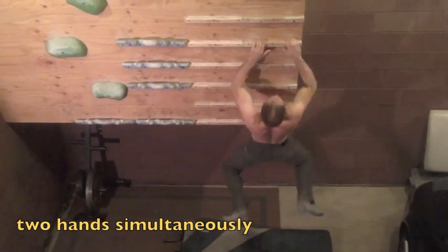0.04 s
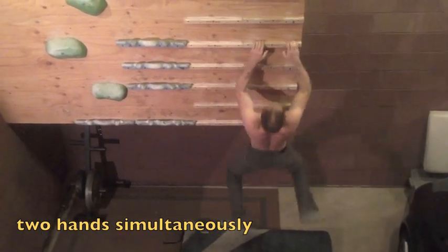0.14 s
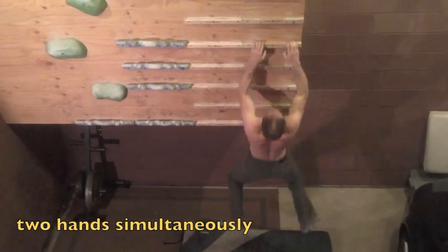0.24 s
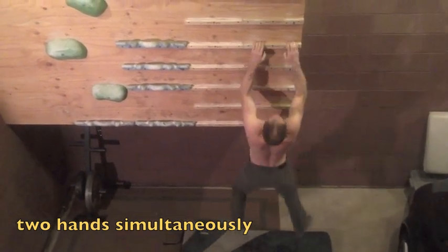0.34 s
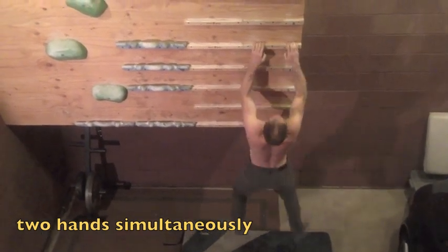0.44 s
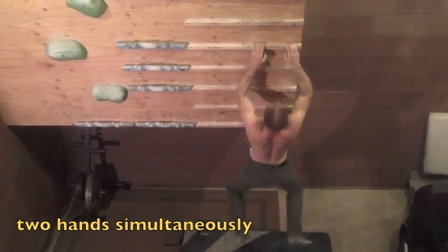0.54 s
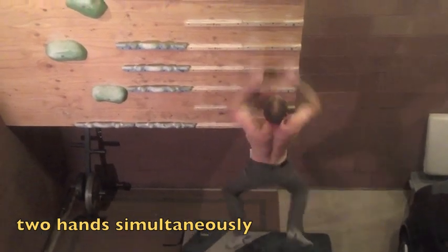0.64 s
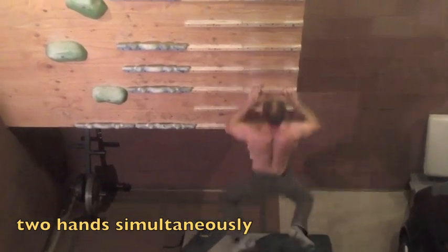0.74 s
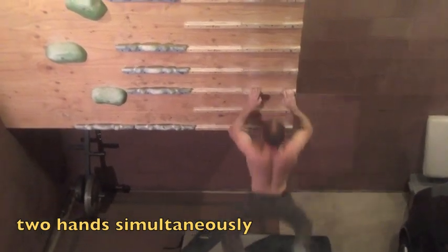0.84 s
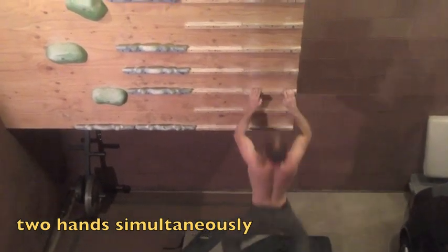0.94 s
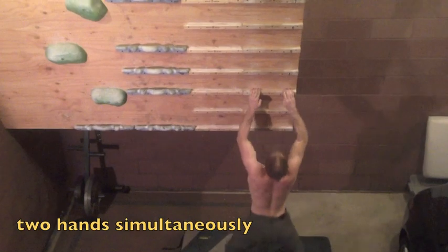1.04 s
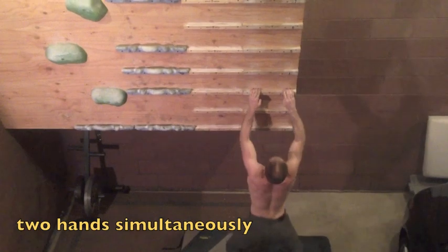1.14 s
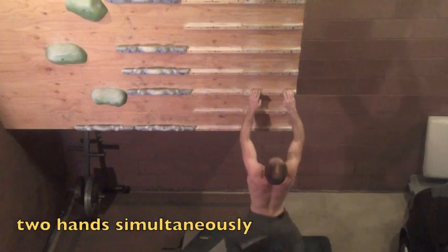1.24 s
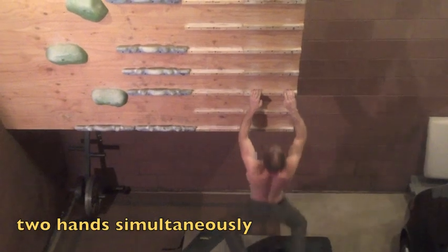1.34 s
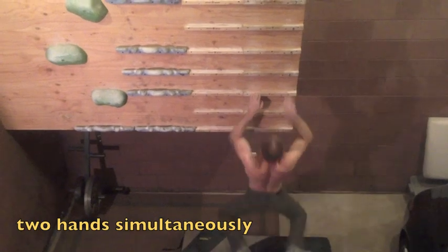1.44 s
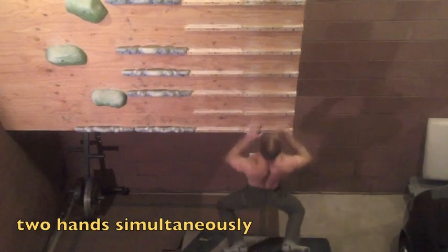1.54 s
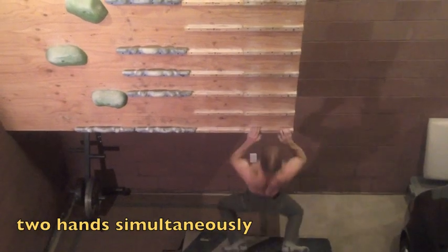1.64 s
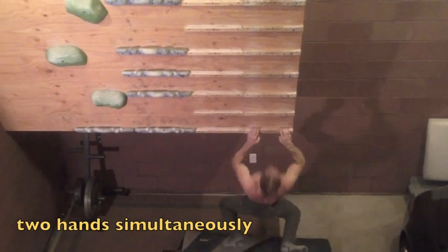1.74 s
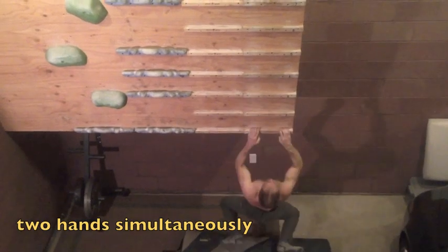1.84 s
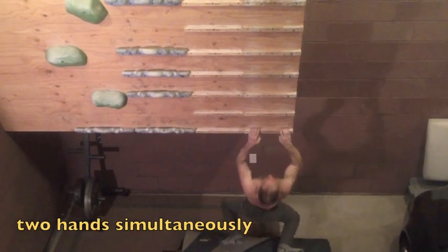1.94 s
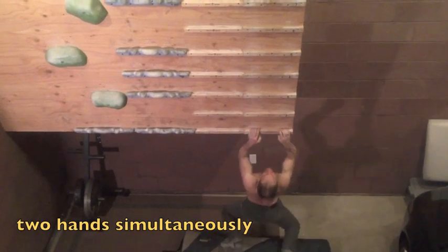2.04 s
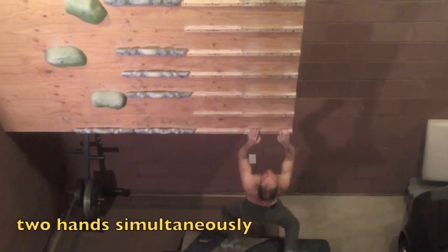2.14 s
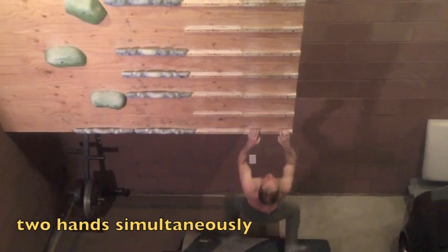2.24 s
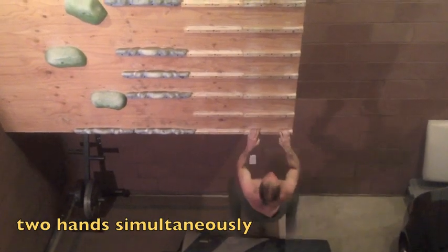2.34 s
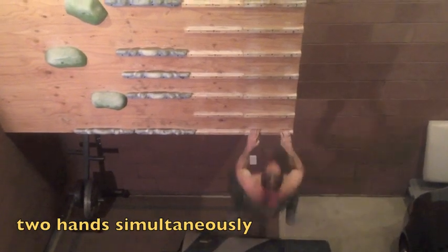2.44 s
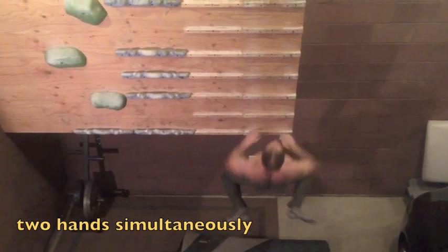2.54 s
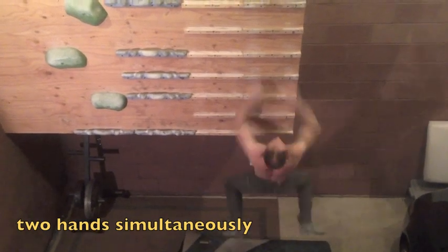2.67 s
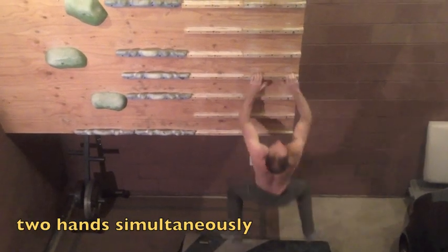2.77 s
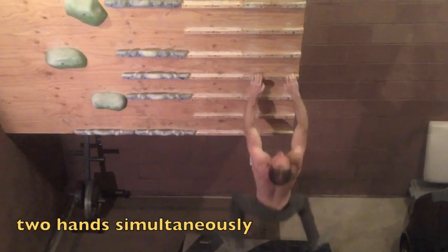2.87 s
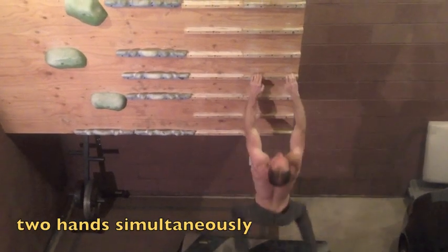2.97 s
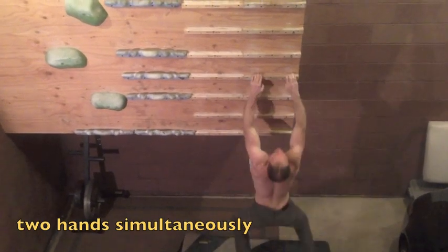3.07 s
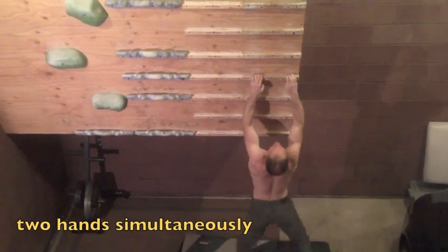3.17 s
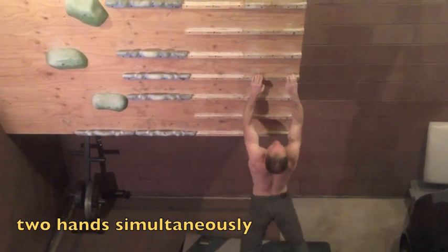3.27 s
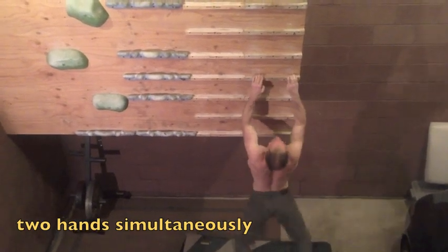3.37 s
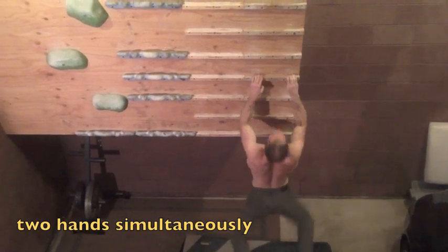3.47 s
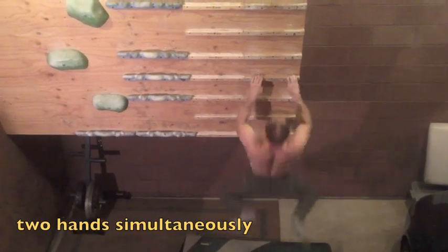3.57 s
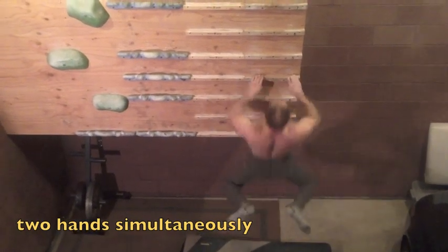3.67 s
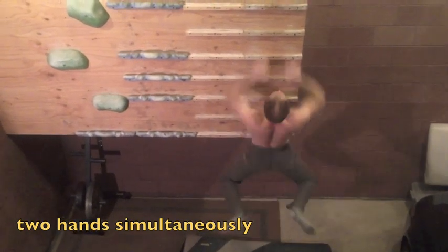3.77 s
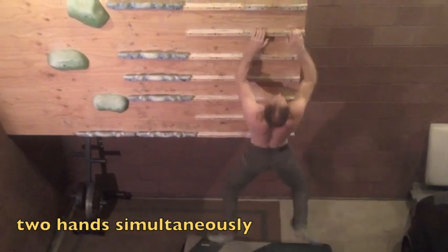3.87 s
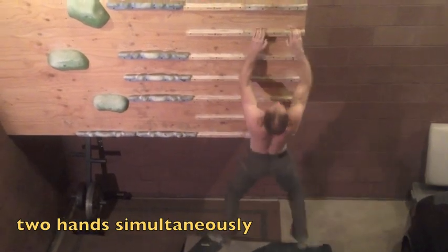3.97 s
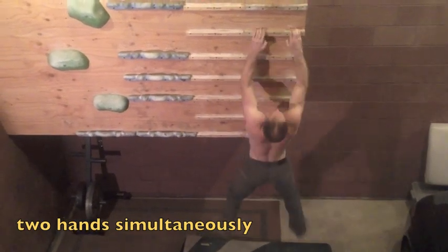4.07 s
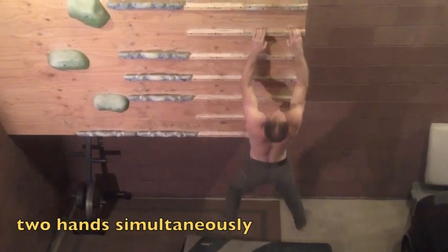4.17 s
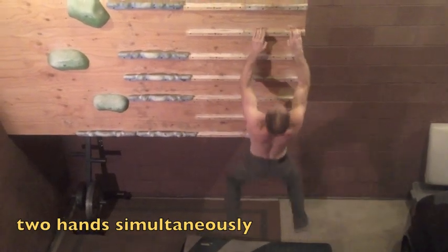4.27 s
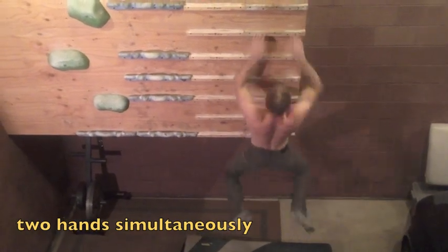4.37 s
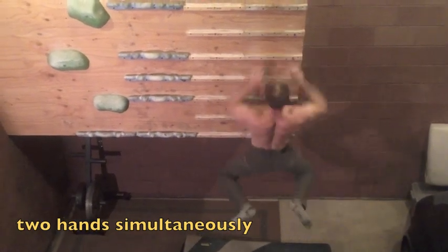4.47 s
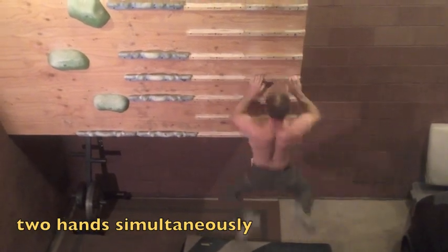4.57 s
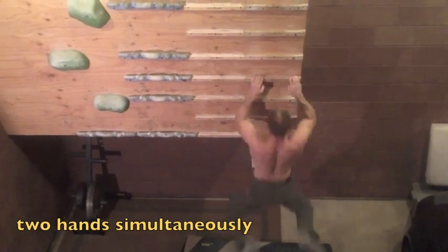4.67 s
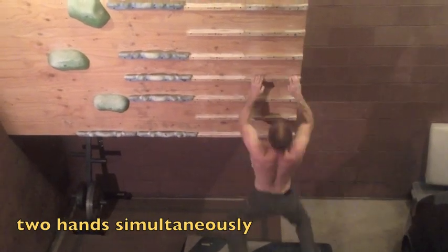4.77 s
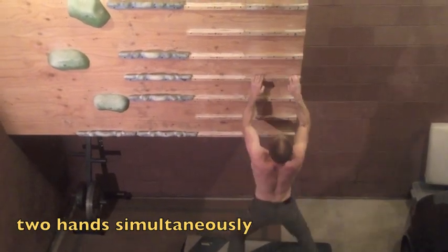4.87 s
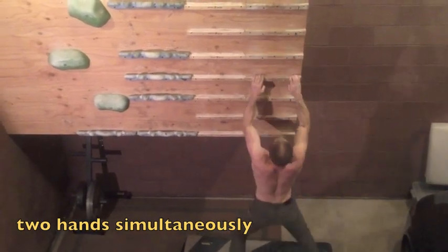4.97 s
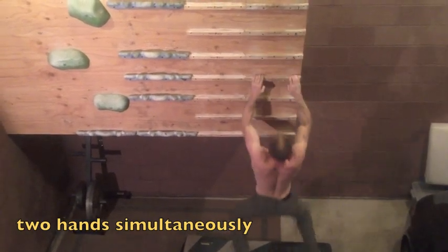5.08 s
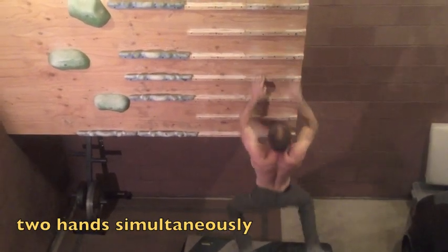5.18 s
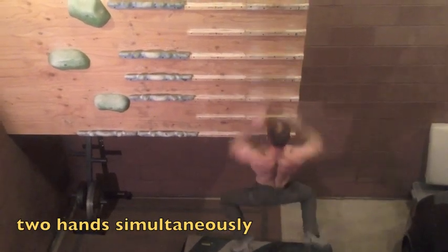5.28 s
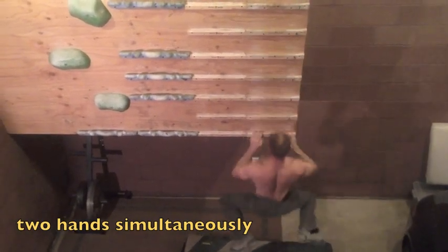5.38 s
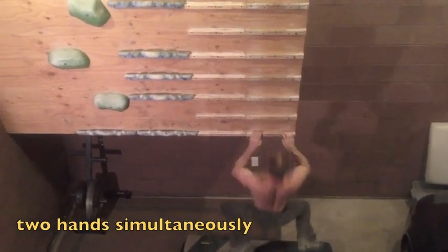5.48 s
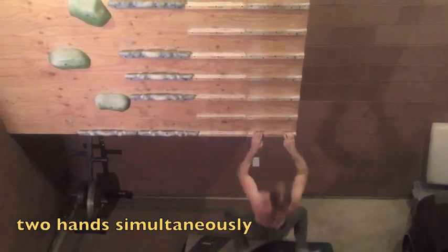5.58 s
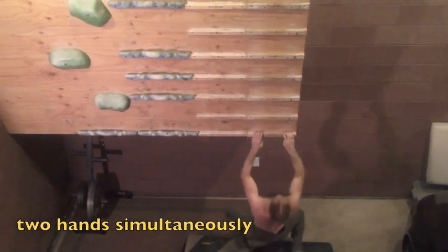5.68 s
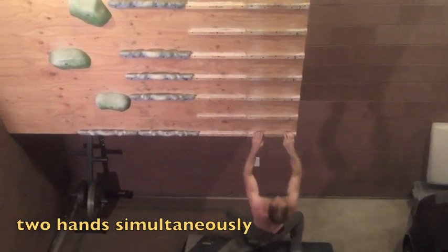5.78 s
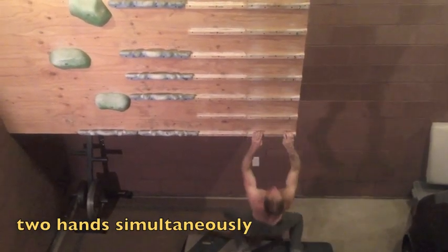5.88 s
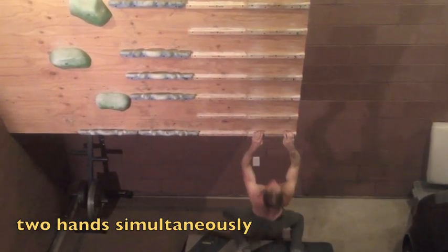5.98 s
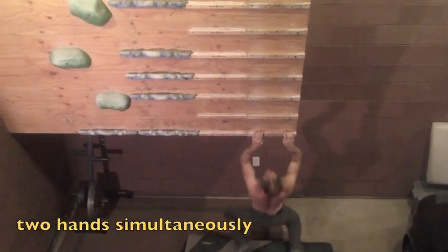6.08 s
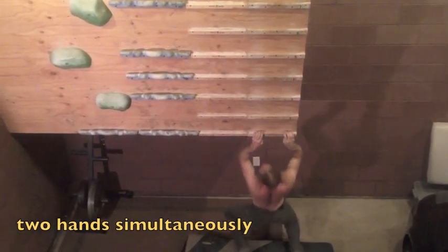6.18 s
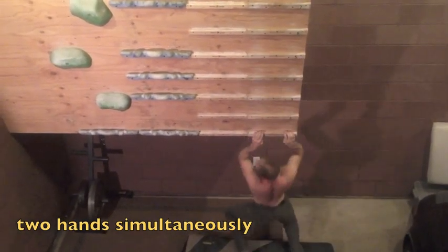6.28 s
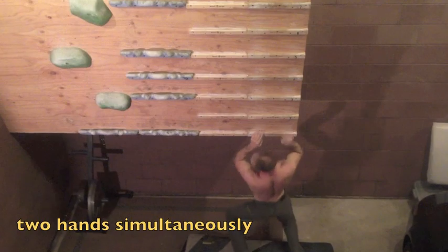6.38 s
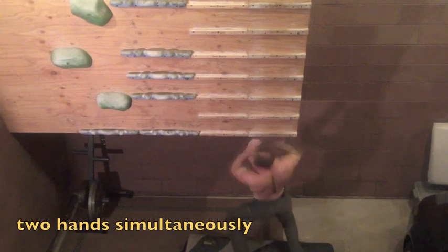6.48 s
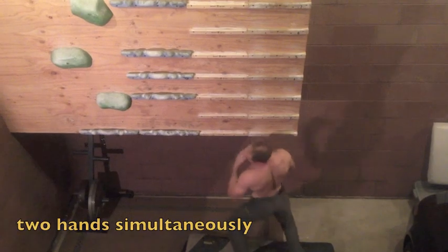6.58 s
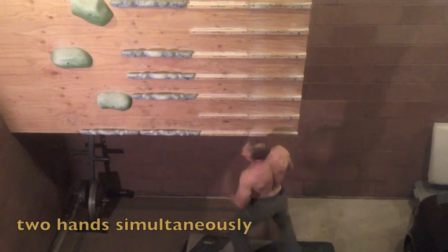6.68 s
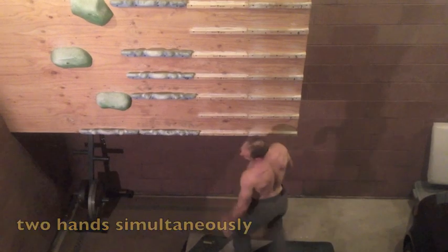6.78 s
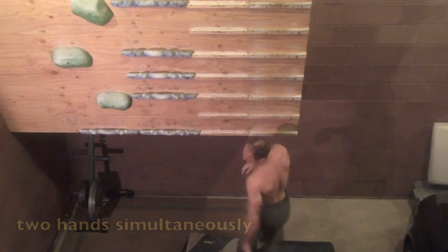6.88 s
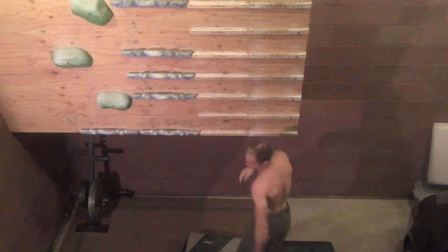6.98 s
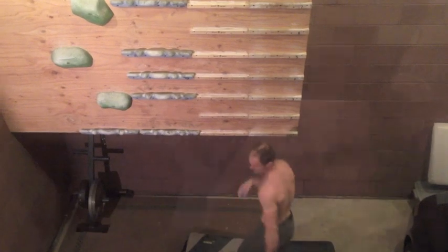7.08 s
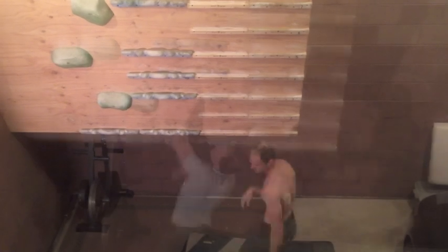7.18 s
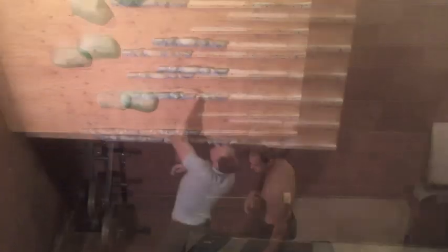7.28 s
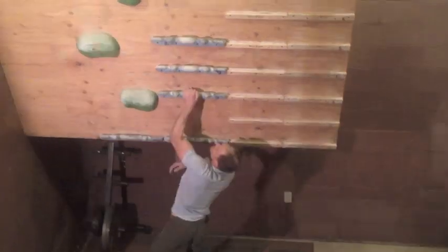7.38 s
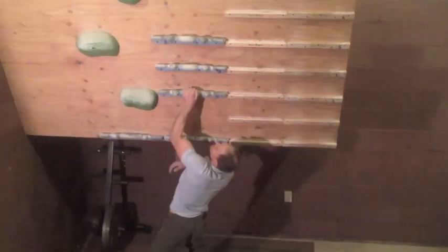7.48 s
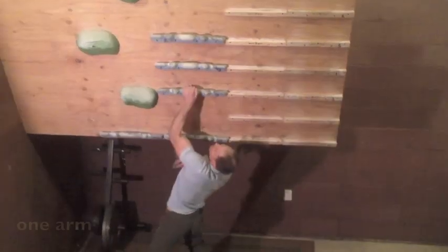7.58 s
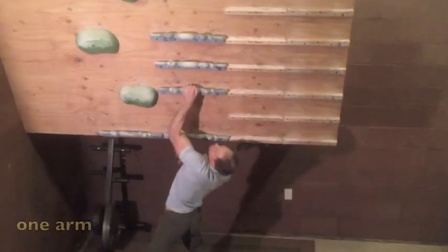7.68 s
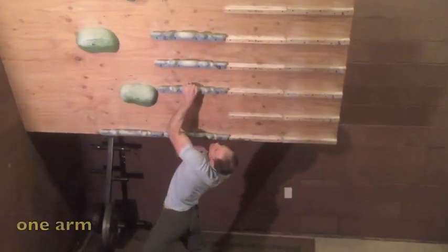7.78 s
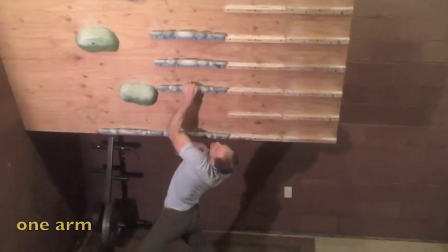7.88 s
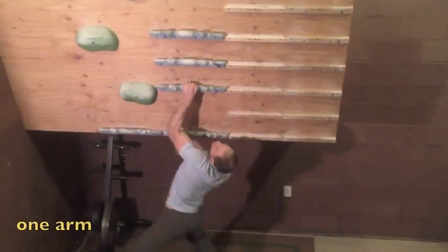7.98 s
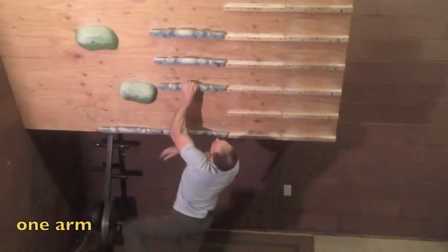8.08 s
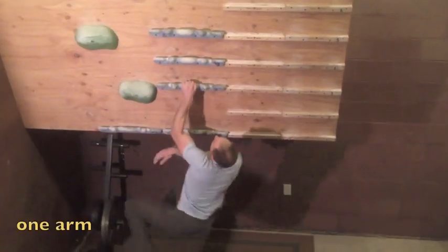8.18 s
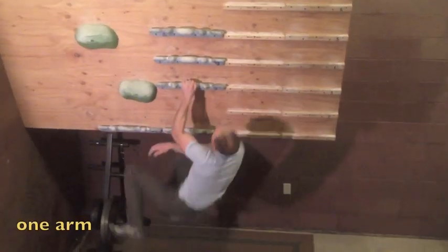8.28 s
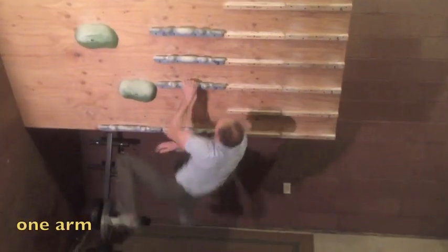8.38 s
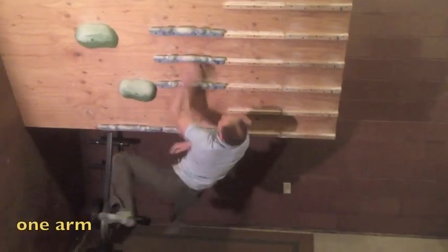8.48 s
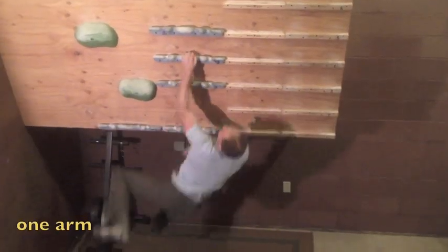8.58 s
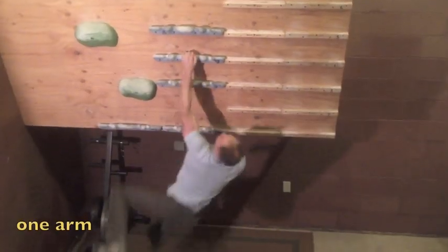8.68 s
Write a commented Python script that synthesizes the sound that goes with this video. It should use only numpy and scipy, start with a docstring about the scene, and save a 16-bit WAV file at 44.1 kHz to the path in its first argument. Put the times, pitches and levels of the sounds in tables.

```python
"""A bare basement room: a climber jumps between wooden rungs screwed to a plywood board.
Fingers scrape off one rung, then both hands slap onto the next and set rung and panel knocking.
Clothes rustle faintly, and feet pad on a foam mat near the end. Behind it all a motor hums and a fan
rushes through a duct. Just after seven seconds the ambience crossfades, dipping briefly, to the same
room with louder hum and a drone."""
import sys
import numpy as np
from scipy import signal
from scipy.fft import rfft, irfft
from scipy.io import wavfile

SR = 44100
rng = np.random.default_rng(int(sys.argv[2]) if len(sys.argv) > 2 else 0)


def wav_record(signal):
    """Record a signal, one row per channel, as 16-bit PCM in the file named by sys.argv[1]."""
    frames = np.transpose(np.atleast_2d(signal))
    bounded = np.clip(frames, -1, 1)
    # unit amplitude maps onto the largest positive 16-bit level
    quanta = np.round(bounded * 32767).astype(np.int16)
    wavfile.write(sys.argv[1], SR, quanta)


N = 384552

THUD_BELOW_HZ, KNOCK_FROM_HZ = 270, 560   # the rung's ring lies between panel thud and knock
GRIP_DAMPING = 0.86   # share of the ring time left under a gripping hand
# tone of skin slapping wood: f/Hz, relative level/dB
SLAP_EQ = [(600, -4), (950, 2), (1400, 1), (2000, -0.5), (3340, -11), (4300, -26.5), (5500, -27),
           (7350, -26.5), (9820, -43), (13500, -35), (15500, -40)]
# one hand hit a row: t/s, thud/dB, ring/dB, knock/dB, slap/dB, smack/dB, ring centre/Hz, attack/s
HAND_HITS = [(0.072, -31, -25.5, -57, -41, -55, 410, 0.0036),
             (.082, -48, -33, -35.5, -46, -59, 336, 0.0034),
             (.725, -30, -39.5, -36.5, -39.5, -47, 325, 0.0018),
             (.751, -50, -52, -34.5, -45, -47.5, 400, 0.0013),
             (1.575, -33, -35, -32.5, -33, -40.5, 315, 0.0078),
             (1.613, -39, -35, -43, -43, -68, 323, 0.0062),
             (2.748, -28.5, -30, -33.5, -33, -46, 348, 0.0052),
             (2.786, -39, -36, -39, -42, -44, 400, 0.0045), (3.873, -38, -32.5, -41, -35, -50, 370, 0.0018),
             (3.895, -36.5, -26, -35.5, -55, -74, 353, 0.0022),
             (4.521, -27.5, -40, -36.5, -38, -42.5, 350, 0.01),
             (4.536, -42, -31.5, -25, -32.5, -49, 397, 0.022),
             (5.354, -32, -33.5, -25, -31, -40, 347, 0.013),
             (5.388, -37, -34.5, -40.5, -36, -50.5, 378, 0.0023),
             (5.428, -61, -54, -37.5, -55, -60, 350, 0.0032),
             (8.546, -29.5, -25.5, -18, -22, -44.5, 340, 0.0015),
             (8.592, -27, -32.5, -43, -46, -68, 330, 0.0028)]


def hand_landings():
    """A firm hit and a rough burst of settling fingers drive the wood; skin slaps on top."""
    out, t = np.zeros(N), np.arange(SR) / SR
    settle_s, smack_rise_s, skin_decay_s = 0.0095, 0.0045, 0.03
    smack, slap = crossover(coloured(grains(0.94), SLAP_EQ), "high", 4300)
    for s, thud_db, ring_db, knock_db, slap_db, smack_db, ring_hz, attack_s in HAND_HITS:
        settling = rng.standard_normal(len(t)) * np.exp(-t / settle_s)
        force = .5 * settling / np.sqrt(np.sum(settling ** 2))
        force[0] += 1   # the firm first contact
        i = round(s * SR)
        n = min(len(t), N - i)
        age = t[:n]
        wood = ringing_wood(force, struck_modes(thud_db, ring_db, knock_db, ring_hz))[:n]
        skin = from_db(slap_db) * slap[i:i + n]
        skin += from_db(smack_db) * smack[i:i + n] * np.minimum(age / smack_rise_s, 1)
        pressing = (1 - np.exp(-age / attack_s)) ** 1.14   # soft flesh loads the wood gradually
        out[i:i + n] += in_room(pressing * (wood + skin * np.exp(-age / skin_decay_s)))
    return low_cut(out, 115)   # the small panel radiates little below its first mode


# free modes of panel and rungs: f/Hz, relative level/dB, T60/s
WOOD_MODES = [(137.3, -7, 0.56), (163.8, -2, 0.36), (199.2, 13, 0.14), (234.7, 1.5, 0.26),
              (245.7, -3, 0.13), (288.3, 4, 0.26), (322, 3.5, 0.24), (354.6, 11.5, 0.1), (386.4, 2.5, 0.34),
              (421.2, 0, 0.24), (473, 2, 0.23), (525.5, 12.5, 0.11), (637.2, 4.5, 0.09), (690.3, 7, 0.079),
              (739.5, 8, 0.067), (862, 7, 0.082), (943, 7, 0.11), (1022, 7, 0.076), (1131, 7, 0.07),
              (1350, 0, 0.026), (1413, 10.5, 0.05), (1540, 7, 0.049)]


def struck_modes(thud_db, ring_db, knock_db, ring_hz):
    """Mode balance of one hit: each rung and spot favours the modes near its own pitches."""
    knock_hz = 1.96 * ring_hz

    def drive_db(hz):
        if hz < THUD_BELOW_HZ:
            return thud_db
        if hz < KNOCK_FROM_HZ:
            return ring_db - 14 * abs(np.log2(hz / ring_hz))
        return knock_db - 9 * abs(np.log2(hz / knock_hz))
    return [(hz, db + drive_db(hz), GRIP_DAMPING * t60) for hz, db, t60 in WOOD_MODES]


def ringing_wood(force, modes):
    """A force drives parallel modes, each with random phase and slight detuning, so every knock differs."""
    out = 0
    for (hz, db, t60), (turn, detune) in zip(modes, rng.random((len(modes), 2))):
        decay = from_db(-60 / (t60 * SR))
        step = 2 * np.pi * hz * (1 + 0.032 * (detune - .5)) / SR
        phase = 2 * np.pi * turn
        onset = [np.sin(phase), decay * np.sin(step - phase)]
        feedback = [1, -2 * decay * np.cos(step), decay * decay]
        out = out + from_db(db) * signal.lfilter(onset, feedback, force)
    return out


# tone of skin scraping wood: f/Hz, relative level/dB
SCRAPE_EQ = [(350, -39), (700, -4.5), (1100, -2), (1600, -6), (2340, -3.5), (3980, -19), (7850, -18),
             (10000, -31), (13000, -23.5), (15500, -33)]
# fingers leave a rung: peak t/s, level/dB, rub f/Hz
FINGER_SLIPS = [(0.607, -41, 1423), (1.457, -43.5, 1620), (2.584, -49, 1640), (3.743, -51, 1750),
                (4.397, -41, 1540), (5.205, -38.5, 1130), (8.43, -50, 950)]


def finger_scrapes():
    """Sliding skin makes a gritty swell with a broad rubbing pitch and lightly shakes the panel."""
    grit = grains(1.3)
    skin, pull, panel_send_db = 0, 0, -47
    for s, db, rub_hz in FINGER_SLIPS:
        slide = swell(s, db, rise_s=0.03, fall_s=0.029)
        skin += slide * coloured(grit, SCRAPE_EQ, [(rub_hz, 140, 13)])
        pull += slide * grit
    low_modes = [(hz, db + panel_send_db, GRIP_DAMPING * t60)
                 for hz, db, t60 in WOOD_MODES if hz < THUD_BELOW_HZ]
    return skin + ringing_wood(pull, low_modes)


# feet meet the mat: t/s, level/dB, f/Hz
FOOTFALLS = [(6.919, -49, 185), (6.98, -52, 241), (8.39, -45, 230)]


def footsteps():
    """Feet push into foam: soft, low, quickly damped thumps."""
    out = np.zeros(N)
    for s, db, hz in FOOTFALLS:
        age = np.maximum(np.arange(N) / SR - s, 0)
        push = age / 0.0059 * np.exp(1 - age / 0.0077)
        out += from_db(db) * push * np.sin(2 * np.pi * hz * age)
    return out


# tone of rubbing fabric: f/Hz, relative level/dB
CLOTH_EQ = [(1500, -30), (3000, 3), (4500, -8.5), (6500, -5.5), (8200, -7), (10000, -19.5), (13000, -10.5),
            (15500, -17)]
# cloth moves: peak t/s, level/dB, half length/s
CLOTH_MOVES = [(1.72, -68, 0.12), (2.9, -65, 0.12), (3.596, -64.5, 0.096), (4.91, -68, .08),
               (5.758, -64.5, .035), (6.41, -65.5, .06), (6.683, -62, 0.055), (6.992, -65, .07),
               (7.16, -61, 0.13), (8.156, -64.5, 0.26)]


def clothes():
    """Fabric rustles in faint swells of bright, grainy noise."""
    movement = sum(swell(s, db, half_s, half_s) for s, db, half_s in CLOTH_MOVES)
    return movement * coloured(grains(1.3), CLOTH_EQ)


# tone of the fan's air: f/Hz, relative level/dB
AIR_EQ = [(15, -82), (25, -59), (59, -40), (86, -19.5), (160, -14), (183, -1.5), (221, -10), (281, -5.5),
          (313, -9), (349, -2.5), (1270, -10.5), (1900, -14), (3340, -18), (4500, -39), (15500, -51.5)]
# duct resonances in the early and the late ambience: f/Hz, width/Hz, boost/dB
EARLY_DUCT_PEAKS = [(359, 34, 9), (489, 22, 8), (519, 19, 4.5), (577, 25, 9), (755, 61, 6), (1886, 48, 7)]
LATE_DUCT_PEAKS = [(384, 34, 0), (810, 67, 3), (970, 53, 4.5)]
# the rush, early row then late row: low band level/dB, upper band level/dB
RUSH_LEVELS = [(-51.5, -54), (-53, -54)]
# narrow bands of the drone: f/Hz, width/Hz, boost/dB
DRONE_PEAKS = [(430, 20, 18), (539, 21, 10), (612, 26, 19), (632, 20, 12)]


def fan():
    """Air rushes through a duct; two beds crossfade, dipping midway, and the late one has a drone."""
    rush, late, drone_db = 0, ambience_crossfade(), -54
    ducts = (EARLY_DUCT_PEAKS, LATE_DUCT_PEAKS)
    for fade, peaks, (low_db, upper_db) in zip((1 - late, late), ducts, RUSH_LEVELS):
        air = coloured(rng.standard_normal(N), AIR_EQ, peaks)
        low, upper = crossover(air, "low", 900)
        rush += fade * from_db(low_db + 0.14 * drift(9.8)) * low
        rush += fade * from_db(upper_db + 1.07 * drift(9.1)) * upper
    drone_eq = [(250, -41), (400, 4), (700, -0.5), (1100, -40)]
    drone = coloured(rng.standard_normal(N), drone_eq, DRONE_PEAKS)
    return rush + from_db(drone_db) * late * drone


MOTOR_HZ, HUM_WAVER_DB = 97.4, 1
# motor harmonics 1 to 3: early level/dB, late level/dB
HUM_LEVELS = [(-88, -71), (-65, -60.5), (-65.5, -58.5)]


def motor_hum():
    """A motor with slightly wandering speed hums in three harmonics, louder in the late ambience."""
    phase = 2 * np.pi * np.cumsum(MOTOR_HZ * (1 + 0.0035 * drift(1.36))) / SR
    hum, late = 0, ambience_crossfade()
    for harmonic, (early_db, late_db) in enumerate(HUM_LEVELS, 1):
        level = from_db(early_db) * (1 - late) + from_db(late_db) * late
        waver = from_db(HUM_WAVER_DB * drift(rate_hz=1))
        hum += np.sqrt(2) * level * waver * np.sin(harmonic * phase)
    return hum


def ambience_crossfade():
    """Share of the late ambience, a later moment of the same room: 0 to 1 over 7.06-7.66 s."""
    return np.interp(np.arange(N) / SR, (7.06, 7.66), [0, 1])


REVERB_DB, REVERB_LOW_CUT_HZ = -2, 146
# decay of the bare room: f/Hz, T60/s
ROOM_DECAY = [(100, 0.4), (250, 0.24), (500, 0.33), (1500, 0.48), (5000, 0.52), (15000, 0.083)]


def in_room(x):
    """Direct sound plus dense reflections that die band by band, in a new random pattern each time."""
    length = int(.6 * SR)
    t, hz = np.arange(length) / SR, np.fft.rfftfreq(length, 1 / SR)
    white = rfft(rng.standard_normal(length))
    edges = 40 * 2 ** np.arange(0, 9.1, 1 / 3)   # third octaves
    arrival = np.clip((t - .003) / 0.0044, 0, 1)   # the first walls answer after a few ms
    tail = 0
    for low, high in zip(edges, edges[1:]):
        band = irfft(white * (hz >= low) * (hz < high), length)
        decay = from_db(-60 * t / at_hz(ROOM_DECAY, low))
        tail += rms_one(band * decay * arrival) * np.sqrt(low)
    tail = low_cut(tail / np.sqrt(np.sum(tail ** 2)), REVERB_LOW_CUT_HZ, order=1)
    return x + from_db(REVERB_DB) * signal.fftconvolve(x, tail)[:len(x)]


def grains(spread_db):
    """Noise with a fluttering level, as of stick and slip."""
    return rng.standard_normal(N) * from_db(spread_db * drift(23))


def drift(rate_hz):
    """Smooth random wander with an rms near 1."""
    control_hz = 60
    knots = rng.standard_normal(int(N / SR * control_hz) + 2)
    memory = np.exp(-2 * np.pi * rate_hz / control_hz)
    slow = rms_one(signal.lfilter([1], [1, -memory], knots))
    return np.interp(np.arange(N) / SR * control_hz, np.arange(len(slow)), slow)


def swell(peak_s, db, rise_s, fall_s):
    """A bell-shaped envelope around a moment."""
    t = np.arange(N) / SR - peak_s
    return from_db(db) * np.exp(-(t / np.where(t < 0, rise_s, fall_s)) ** 2)


def coloured(x, eq, peaks=()):
    """Shape noise with an EQ curve and resonant peaks (f/Hz, width/Hz, boost/dB); rms 1."""
    hz = np.fft.rfftfreq(len(x), 1 / SR)
    boost_db = sum(db / (1 + (2 * (hz - centre) / width) ** 2) for centre, width, db in peaks)
    return rms_one(irfft(rfft(x) * from_db(at_hz(eq, hz) + boost_db), len(x)))


def at_hz(curve, hz):
    """Read a curve on a log frequency axis."""
    freqs, values = np.array(curve).T
    return np.interp(np.log(np.maximum(hz, 1)), np.log(freqs), values)


def crossover(x, side, hz):
    """Zero-phase split into the named side and the rest, each at rms 1."""
    band = signal.sosfiltfilt(signal.butter(2, hz, side, fs=SR, output="sos"), x)
    return rms_one(band), rms_one(x - band)


def low_cut(x, hz, order=2):
    """Roll off the bass."""
    return signal.sosfilt(signal.butter(order, hz, "high", fs=SR, output="sos"), x)


def from_db(db):
    """Gain of a level."""
    return 10 ** (np.asarray(db) / 20)


def rms_one(x):
    """Scale to rms 1."""
    return x / np.sqrt(np.mean(x ** 2) + 1e-20)


def scene():
    """Hands and feet in the room over a bed of cloth, fan and motor; mono."""
    climber = clothes() + hand_landings() + in_room(finger_scrapes() + footsteps())
    return (climber + fan() + motor_hum())[None]


HISS_DB, RUMBLE_DB, TOP_CUT_HZ = -69, -90, 15750
# tone of the microphone's self-noise: f/Hz, relative level/dB
HISS_EQ = [(2060, -44), (3500, -10.5), (4410, -11.5), (6360, -11.5), (8210, -13.5), (10100, -30),
           (13500, -17), (15500, -20)]


def record(dry):
    """A small microphone with weak bass and its own hiss and faint rumble; the top is cut."""
    thin = low_cut(dry, 110)
    hiss = from_db(HISS_DB) * coloured(rng.standard_normal(N), HISS_EQ)
    rumble = from_db(RUMBLE_DB) * coloured(rng.standard_normal(N), [(15, -4), (70, -1), (200, -43)])
    return signal.sosfilt(signal.cheby2(20, 60, TOP_CUT_HZ, fs=SR, output="sos"), thin + hiss + rumble)


dry = scene()
out = record(dry)
wav_record(out)
```